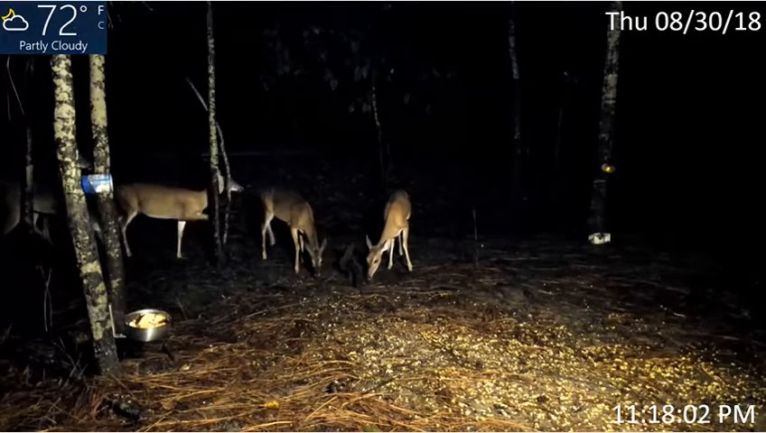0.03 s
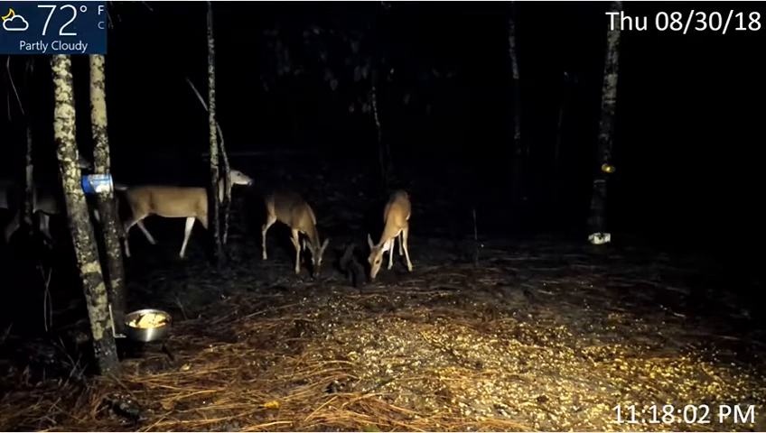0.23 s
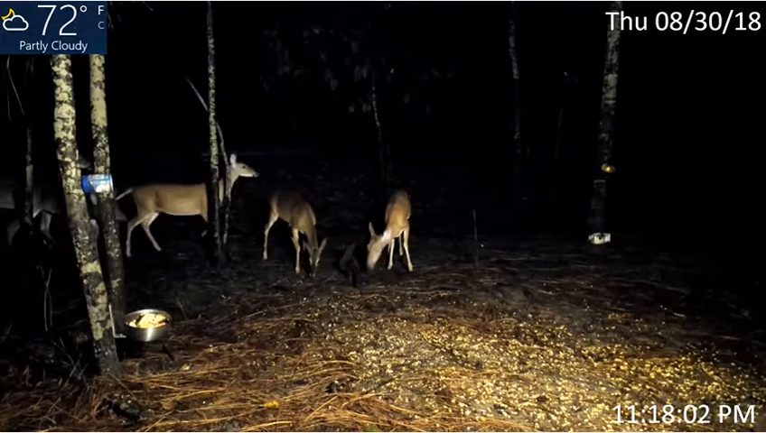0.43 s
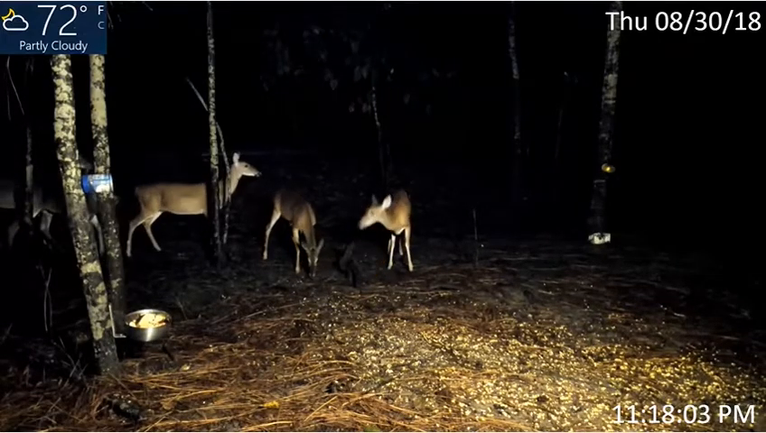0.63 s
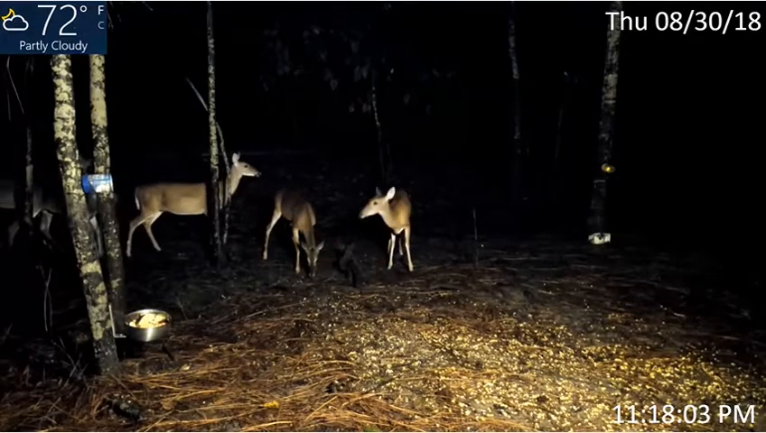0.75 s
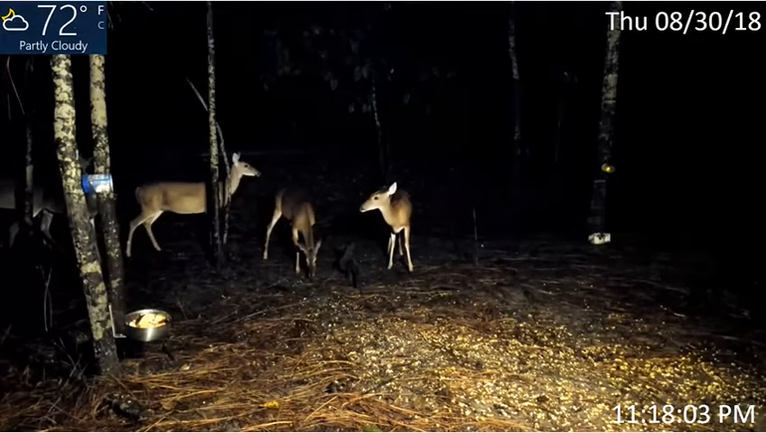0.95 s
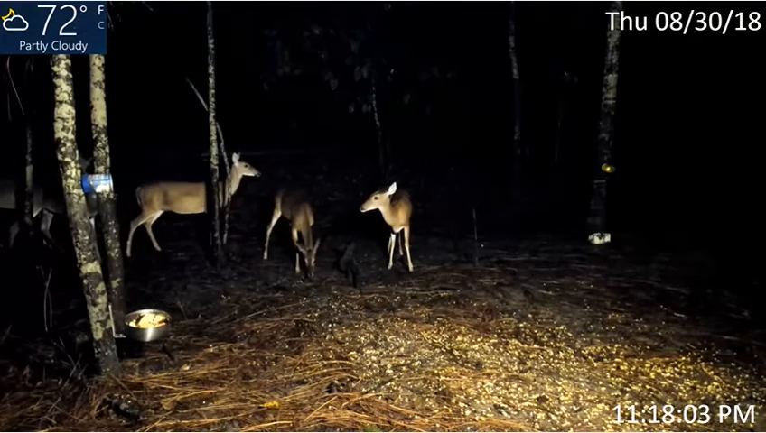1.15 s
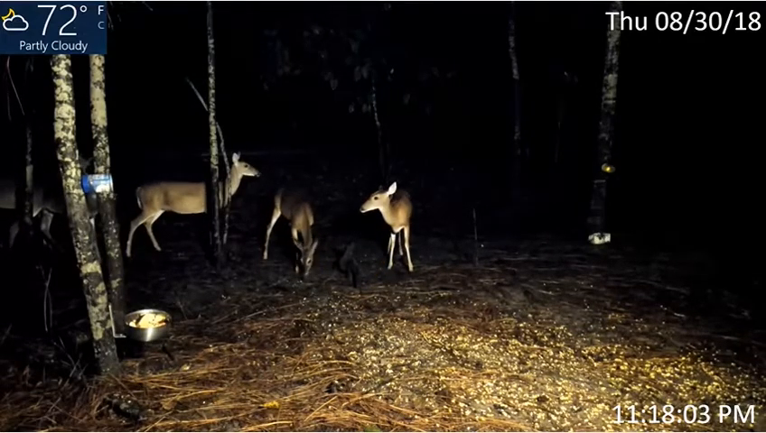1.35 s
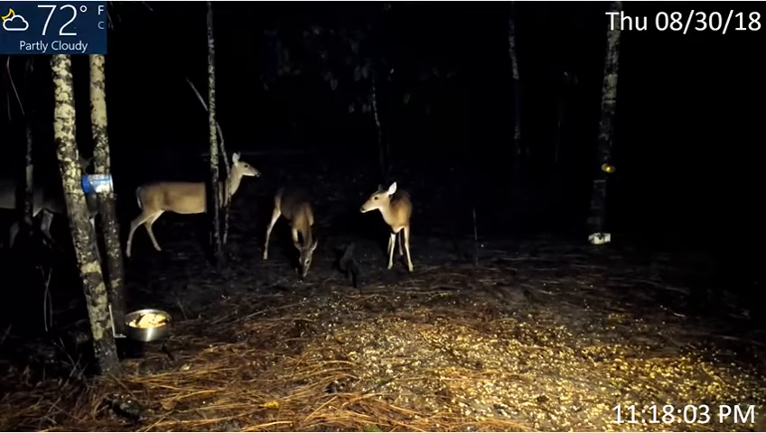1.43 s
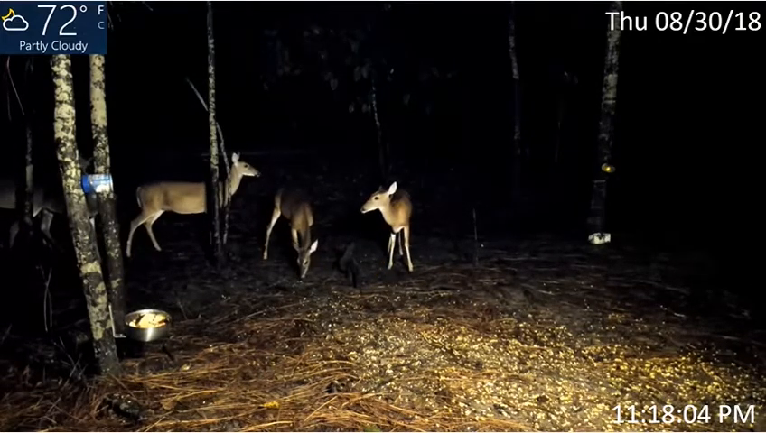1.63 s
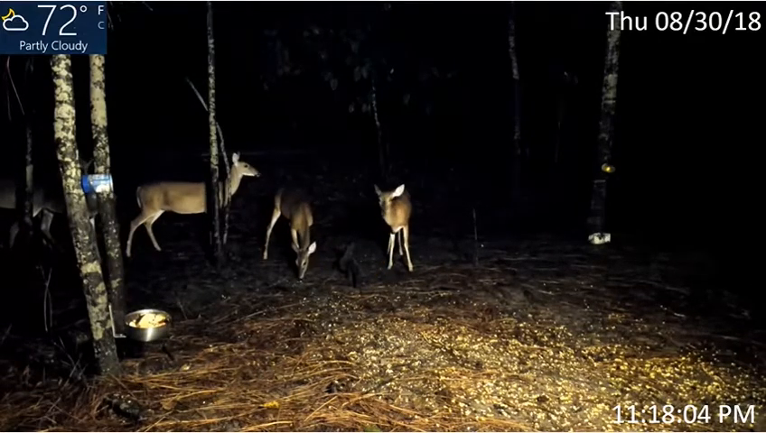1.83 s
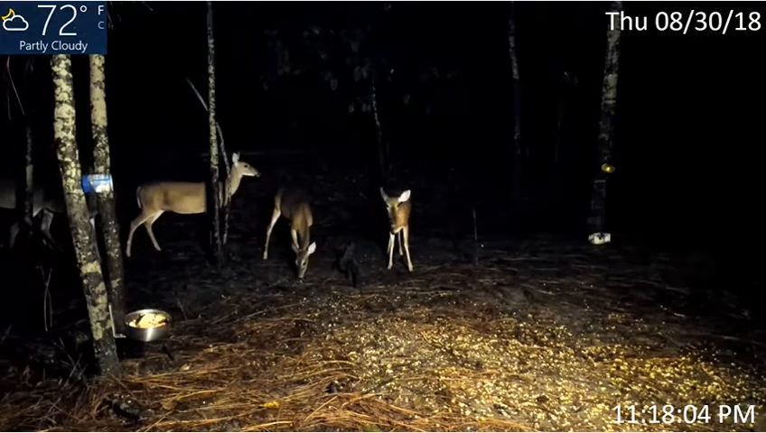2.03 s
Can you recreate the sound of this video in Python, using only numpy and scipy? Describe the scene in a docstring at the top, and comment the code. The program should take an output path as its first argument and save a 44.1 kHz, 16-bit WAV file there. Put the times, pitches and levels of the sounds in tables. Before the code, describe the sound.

A deer snorts once, loud and close, from about 0.2 to 0.6 seconds: a hard hiss of air with a brief flutter and an unsteady whistle, sinking as it runs out. The woods echo it faintly until about 1.2 seconds. Soft hoof knocks and dry straw rustles come at the start and near 0.8, 1.1, 1.5 and 1.9 seconds. Night insects shrill steadily throughout over a faint hum.

```python
"""A deer snorts once near the microphone, at a feeding place in the woods at night: a hard jet of air
through the nostrils, which flutter briefly, whistle near 1 kHz and slacken as the blow runs out.
The trees throw the whistle back from a distance. Insects shrill all round, and hooves knock and rustle
in the pine straw. Breath and steps set the camera housing ringing; the equipment hums faintly,
and its automatic gain dips at the snort."""
import sys
import numpy as np
from scipy import signal
from scipy.fft import rfft, irfft
from scipy.io import wavfile
from scipy.ndimage import uniform_filter1d

SR = 44100
rng = np.random.default_rng(int(sys.argv[2]) if len(sys.argv) > 2 else 0)


def persist_wave(psi):
    """Save psi, clipped to +-1, as 16-bit WAV."""
    counts = np.round(np.clip(psi, -1, 1) * 32767).astype(np.int16)
    wavfile.write(sys.argv[1], SR, np.atleast_2d(counts).T)


N = 92610
T = np.arange(N) / SR
HZ = np.maximum(np.fft.rfftfreq(N, 1 / SR), 1)

def from_db(db):
    """Decibels to gain."""
    return 10 ** (np.asarray(db) / 20)

def rms_one(x):
    """Scale to an rms of 1."""
    return x / np.sqrt(np.mean(x ** 2) + 1e-20)

def in_time(rows, column=1):
    """One column of a curve at every sample."""
    rows = np.array(rows)
    return np.interp(T, rows[:, 0], rows[:, column])

def gain_curve(rows, column=1):
    """A dB curve as gain, silent outside its span."""
    return from_db(in_time(rows, column)) * (T >= rows[0][0]) * (T <= rows[-1][0])

def in_frequency(rows):
    """A curve at every frequency bin, joined on a log axis."""
    hz, values = np.transpose(rows)
    return np.interp(np.log(HZ), np.log(hz), values)

def drift(rate_hz):
    """Smooth random wander; rms 1."""
    return rms_one(irfft(rfft(rng.standard_normal(N)) * np.exp(-.5 * (HZ / rate_hz) ** 2), N))

def phase(hz):
    """Running phase of a moving pitch."""
    return 2 * np.pi * np.cumsum(hz) / SR

def pulses(rate_hz, decay_s, jitter):
    """An uneven train of dying pulses; rms 1."""
    cycles = np.cumsum(rate_hz * (1 + jitter * drift(rate_hz / 2))) / SR
    age_s = cycles % 1 / rate_hz
    return rms_one(np.exp(-age_s / decay_s) * (1 - np.exp(-2 * age_s / decay_s)))

def burst(start_s, attack_s, t60_s):
    """A straight rise and an exponential fall."""
    rise = np.clip((T - start_s) / attack_s, 0, 1)
    return rise * from_db(-60 * np.maximum(T - start_s - attack_s, 0) / t60_s)

# Likeness of left and right at the microphone: frequency_hz, correlation
MIC_LIKENESS = [(60, 0.93), (700, 0.94), (1200, 0.94), (2000, 0.6), (3300, 0.25), (4700, 0.73),
                (5600, 0.875), (7000, 1)]
def stereo_noise(gain):
    """Noise with the given gain per frequency, partly alike on both sides; rms 1."""
    mid, side = rfft(rng.standard_normal((2, N)))
    alike = in_frequency(MIC_LIKENESS)
    spectrum = np.sqrt(1 + alike) * mid + np.sqrt(1 - alike) * side * [[1], [-1]]
    return rms_one(irfft(gain * spectrum, N))

def coloured(colour):
    """Noise of a broad colour; rms 1."""
    return stereo_noise(from_db(in_frequency(colour)))

def resonant(peaks):
    """Noise in steep-sided resonances, each at its own level."""
    return sum(from_db(db) * stereo_noise(1 / (1 + .5 * ((HZ - hz) / width_hz) ** 2) ** 2)
               for hz, width_hz, db in peaks)

# Night air under the trees: frequency_hz, gain_db
AIR_COLOUR = [(20, -34), (45, -31), (70, -5.5), (130, 0), (250, 2), (400, -8.5), (640, -2), (1000, -2),
              (1450, -6.5), (2000, -11.5), (2800, -17.5), (5000, -20), (8000, -30), (12300, -20.5),
              (13500, -30), (15500, -45)]
def night_air():
    """A soft, steady wash of low noise."""
    return from_db(-51.5) * coloured(AIR_COLOUR)

# Hum in the equipment: pitch_hz, level_db
HUM_TONES = [(574, -58.5), (1239, -62.5)]
def hum():
    """Two faint electrical tones."""
    return sum(np.sqrt(2) * from_db(db) * np.sin(2 * np.pi * hz * T) for hz, db in HUM_TONES)

# Insects far off, all round the microphone: frequency_hz, gain_db
CHORUS_COLOUR = [(4800, -39), (5300, -16.5), (5650, -10), (5900, -2), (6230, -3.5), (6480, -6), (6800, -22),
                 (7600, -29.5), (11000, -39), (12300, -37.5), (13200, -50)]
def insect_chorus():
    """Many calls merge into one shrill, flickering band."""
    return from_db(-47 + drift(40)) * coloured(CHORUS_COLOUR)

# One insect close to the microphone: time_s, level_db
TRILL_LEVEL = [(0.0, -44.5), (0.045, -37), (0.1, -40), (0.2, -39.5), (0.3, -48), (0.4, -66)]
def near_insect():
    """A fast, high trill that falls silent at the snort."""
    band = stereo_noise(np.exp(-((HZ - 6060) / 430) ** 2))
    return gain_curve(TRILL_LEVEL) * pulses(rate_hz=69, decay_s=.008, jitter=.2) * band

# Bouts of the lower insects in the woods: middle_s, level_db
RASP_BOUTS = [(0.038, -67), (0.63, -52), (0.92, -55), (1.24, -56.5), (1.54, -58), (1.81, -58.5),
              (2.05, -66.5)]
# Their resonances: centre_hz, width_hz, gain_db
RASP_PEAKS = [(3753, 140, 7), (4054, 55, 4)]
def rasping_insects():
    """A flickering rasp swells in slow waves over a faint floor."""
    bouts = sum(from_db(db) * np.exp(-((T - middle_s) / .086) ** 2) for middle_s, db in RASP_BOUTS)
    return (from_db(-67.5) + bouts) * from_db(1.8 * drift(25)) * rms_one(resonant(RASP_PEAKS))

# Rustles on the forest floor: start_s, level_db, attack_s, t60_s
RUSTLES = [(0.0, -54, 0.0033, 0.22), (0.714, -48, 0.011, 0.3), (1.086, -49.5, 0.0018, 0.12),
           (1.368, -49, 0.0043, 0.044), (1.42, -61, 0.02, 0.24), (1.63, -61, 0.018, 0.39),
           (1.865, -58.5, 0.021, 0.29)]
# Dry pine straw: frequency_hz, gain_db
STRAW_COLOUR = [(2000, -41), (6000, -8), (8300, 4.5), (10800, -5), (13000, -22), (16000, -35)]
def straw():
    """Dry straw stirs underfoot in short, bright hisses."""
    level = sum(from_db(db) * burst(start_s, attack_s, t60_s) for start_s, db, attack_s, t60_s in RUSTLES)
    return level * coloured(STRAW_COLOUR)

# Steps at the feeding place: start_s, pitch_hz, knock_db, ring_db
STEPS = [(0.018, 1466, -42, -53), (0.777, 1490, -38, -52), (0.999, 1505, -56, -59), (1.148, 1485, -43, -53),
         (1.523, 1962, -48.5, -54), (1.8, 1400, -65, -54.5), (1.864, 1430, -54, -55.5)]
# A hoof on the ground: frequency_hz, gain_db
KNOCK_COLOUR = [(300, -23), (700, -14), (1200, -16), (1500, -6), (1750, -1.5), (2100, -16), (2400, -12),
                (4000, -44)]
# High ring of the camera housing: centre_hz, width_hz, gain_db
STEP_RING_PEAKS = [(4030, 360, -36), (4600, 220, 39)]
def hooves():
    """Each hoof lands with a small hollow knock and sets the housing ringing."""
    thud, ring = from_db(-5) * coloured(KNOCK_COLOUR), rms_one(resonant(STEP_RING_PEAKS))
    steps = 0
    for start_s, pitch_hz, knock_db, ring_db in STEPS:
        knock = thud + resonant([(pitch_hz, 85, -2)])
        impact = from_db(knock_db) * knock + from_db(ring_db) * ring
        steps += burst(start_s, attack_s=.0027, t60_s=.32) * impact
    return steps

# Echoes from the surrounding trees: band_hz, gain_db, t60_s
WOODS_BANDS = [(200, -26, .7), (732.3, -19, 0.48), (1031, -12, 1.9), (1170, -11, 0.73), (1260, -9.5, 1.3),
               (1370, -25, 0.7), (1484, -8.5, 1.2), (1590, -18, 1.0), (2150, -21.5, 1.5), (2950, -20, 1.3),
               (3750, -14, 0.98), (4060, -25, 0.76), (4600, -14, 1.07), (5500, -12, 0.5), (9720, -23, 1.2),
               (14900, -40, .35)]
def woods(x, trunks_per_s=70, farthest_s=.58):
    """Scatter from foliage and single echoes from trunks, dying band by band."""
    trunks = (rng.random(N) < trunks_per_s / SR) * rng.choice([-1, 1], N)
    scatter = rfft(stereo_noise(1) + from_db(14) * trunks)
    reach = np.clip(T / .024, 0, 1) * np.clip((farthest_s - T) / .013 + 1, 0, 1)
    centres = np.log([row[0] for row in WOODS_BANDS])
    response = 0
    for share, (_, db, t60_s) in zip(np.eye(len(WOODS_BANDS)), WOODS_BANDS):
        decay = reach * from_db(-60 * T / t60_s)
        band = irfft(scatter * np.interp(np.log(HZ), centres, share), N)
        response += from_db(db) * band * decay / np.linalg.norm(decay)
    return signal.fftconvolve(x, response, axes=1)[:, :N]

# The jet at the nostrils, near the microphone: time_s, level_db
JET_LEVEL = [(0.19, -65), (0.206, -31), (0.221, -17), (0.252, -18), (0.28, -16), (0.325, -19), (0.352, -20),
             (0.41, -21), (0.455, -24), (0.485, -31), (0.52, -32), (0.57, -40), (0.62, -79)]
# Its hiss: frequency_hz, gain_db
JET_COLOUR = [(500, -41), (1700, -7.5), (2600, -11.5), (3000, -5.5), (3400, -13.5), (4000, -2.5), (4950, 2),
              (5350, 1), (6900, 1.5), (8800, -3), (11200, -5), (12600, -16), (15500, -30.5)]
def jet(treble_hz=7300, dulling=.53):
    """Turbulent air hisses out of the nostrils and dulls as it slackens."""
    hiss, effort_db = coloured(JET_COLOUR), in_time(JET_LEVEL)
    treble = irfft(rfft(hiss) / (1 + (treble_hz / HZ) ** 6), N)
    treble_gain = from_db(dulling * (effort_db - effort_db.max() + 6.5))
    return gain_curve(JET_LEVEL) * (hiss - treble + treble * treble_gain)

def close_reflections(x, count=14, latest_s=.022):
    """The ground and nearby trunks comb the sound at unchanged power."""
    delay_s, sign = rng.uniform(.001, latest_s, count), rng.choice([-1, 1], count)
    response = np.zeros(SR // 10)
    np.add.at(response, (delay_s * SR).astype(int), sign * from_db(-10) / np.sqrt(count))
    response[0] = 1
    return signal.fftconvolve(x, response[None] / np.linalg.norm(response), axes=1)[:, :N]

# The rush in the nose, a little left of the microphone: time_s, level_db
RUSH_LEVEL = [(0.192, -75), (0.208, -39.5), (0.225, -28), (0.258, -34.5), (0.275, -16.5), (0.31, -23),
              (0.38, -22.5), (0.455, -21.5), (0.49, -25.5), (0.52, -26), (0.565, -32), (0.6, -56),
              (0.63, -57)]
# Its hollow colour: frequency_hz, gain_db
RUSH_COLOUR = [(150, -29), (300, -17), (480, -29.5), (660, -11), (830, -11), (1080, 1.5), (1400, 0),
               (1750, -3), (2120, -3.5), (2320, -15.5), (3400, -14), (5000, -14), (7000, -59)]
# Ringing of the camera housing: centre_hz, width_hz, gain_db
HOUSING_PEAKS = [(1500, 55, -12), (1980, 45, -5), (2140, 50, -13), (3760, 110, -12), (4660, 150, -6)]
def rush():
    """A hollow rush of breath excites the housing's resonances."""
    breath = from_db(-3) * coloured(RUSH_COLOUR) + resonant(HOUSING_PEAKS)
    pan = from_db([[1.1], [-1.1]])
    return gain_curve(RUSH_LEVEL) * breath * pan

# The whistle at the nostrils, dead centre: time_s, pitch_hz, level_db
WHISTLE = [(0.214, 975, -56), (0.228, 1014, -22), (0.239, 1028, -22), (0.25, 1060, -38),
           (0.278, 998.5, -27), (0.291, 1024, -21.5), (0.302, 1016, -14), (0.312, 1088, -24),
           (0.332, 1076, -22.5), (0.346, 1023, -18), (0.37, 1076, -21.5), (0.385, 1030, -28.5),
           (0.412, 1036, -23.5), (0.46, 999, -29.5), (0.5, 951, -29.5)]
def whistle():
    """An unsteady edge tone that catches and breaks."""
    pitch_hz = in_time(WHISTLE) * (1 + .016 * drift(92))
    level = gain_curve(WHISTLE, column=2) * from_db(2.3 * drift(85))
    return level * np.sqrt(2) * np.sin(phase(pitch_hz))

# The flutter as it leaves the nose: frequency_hz, gain_db
FLUTTER_COLOUR = [(25, -45), (60, -24), (150, -13), (290, -10.5), (400, -10), (520, -21), (660, 4),
                  (830, -8), (1200, 0), (1550, 5), (2100, 3.5), (2600, -20), (5000, -26)]
def flutter(start_s=.2602, length_s=.033):
    """The nostrils flap at the height of the blow: rough puffs, shaped by the nose."""
    progress = np.clip((T - start_s) / length_s, 0, 1)
    swell = np.sqrt(np.abs(np.sin(np.pi * progress)))
    flaps = pulses(rate_hz=292.1, decay_s=.0018, jitter=.253)
    puffs = flaps * coloured([(100, -1.5), (2500, 1), (5000, -18)])
    shaped = irfft(rfft(puffs) * from_db(in_frequency(FLUTTER_COLOUR)), N)
    return from_db(-20) * swell * rms_one(shaped)

# The tail of the snort, dead centre: time_s, pitch_hz, level_db
SAG = [(0.37, 998, -46), (0.42, 852, -37), (0.45, 780, -29), (0.48, 822, -28), (0.51, 725, -27.5),
       (0.538, 687.4, -28), (0.556, 610.6, -46.5), (0.566, 299, -42.5), (0.605, 210.7, -47.5),
       (0.635, 167.4, -55)]
def sag(width_share=.24):
    """A breathy resonance sinks as the nostrils slacken."""
    pitch_hz, first_hz = in_time(SAG), SAG[0][1]
    slowed_s = np.cumsum(pitch_hz / first_hz) / SR  # the band narrows as it sinks
    cos_noise, sin_noise = (np.interp(slowed_s, T, drift(width_share * first_hz / 2)) for _ in range(2))
    turn = phase(pitch_hz)
    return gain_curve(SAG, column=2) * (cos_noise * np.cos(turn) + sin_noise * np.sin(turn))

# Returns from the far tree line: delay_s, gain_db
FAR_ECHOES = [(0.36, -27), (0.47, -27), (0.6, -24.5)]
def tree_line(x):
    """Late, single echoes that carry little but the whistle."""
    whistle_band = signal.butter(2, [970, 1130], "band", fs=SR, output="sos")
    dull = signal.sosfilt(whistle_band, x.mean(axis=0))
    return sum(from_db(db) * np.interp(T - delay_s, T, dull, left=0) for delay_s, db in FAR_ECHOES)

def blip(middle_s=1.128, pitch_hz=1030):
    """A last short, soft tone at the whistle's pitch."""
    level = from_db(-43) * np.exp(-((T - middle_s) / .009) ** 2)
    return level * np.sqrt(2) * np.sin(2 * np.pi * pitch_hz * T)

def scene():
    """What reaches the microphone: the snort, the hooves and their echoes over the night."""
    night = night_air() + hum() + insect_chorus() + near_insect() + rasping_insects()
    steps = straw() + hooves()
    blow = (close_reflections(jet()) + rush()) * from_db(.5 * drift(72))
    snort = from_db(3.5) * (blow + whistle() + flutter() + sag())
    return night + steps + snort + woods(steps + snort) + tree_line(snort) + blip()

def record(dry, threshold_db=-26.5, cut_share=.26, recovery_db_per_s=4):
    """The automatic gain drops at the snort and creeps back; the top is cut steeply."""
    power = uniform_filter1d(np.mean(dry ** 2, axis=0), size=400)
    level_db = 10 * np.log10(np.maximum(power, 1e-12))
    cut_db = cut_share * np.maximum(level_db - threshold_db, 0)
    recovery_db = recovery_db_per_s * T
    held_db = np.maximum.accumulate(cut_db + recovery_db) - recovery_db
    lowpass = signal.cheby2(16, 70, 16000, fs=SR, output="sos")
    return signal.sosfilt(lowpass, dry * from_db(-held_db))

dry = scene()
out = record(dry)
persist_wave(out)
```